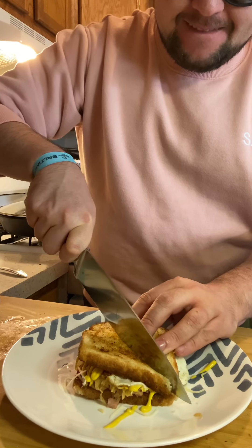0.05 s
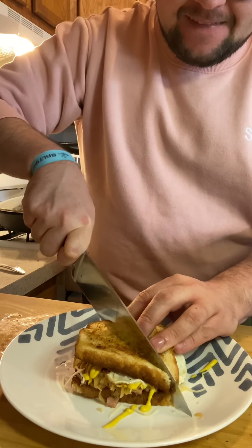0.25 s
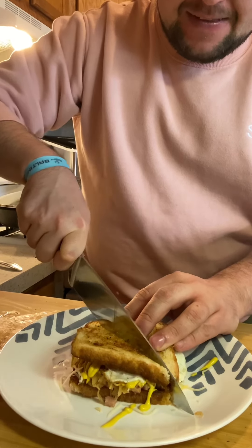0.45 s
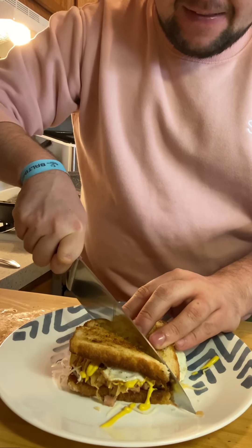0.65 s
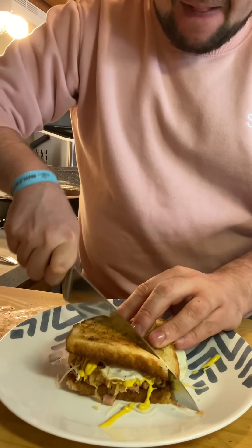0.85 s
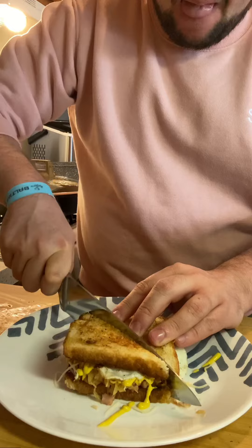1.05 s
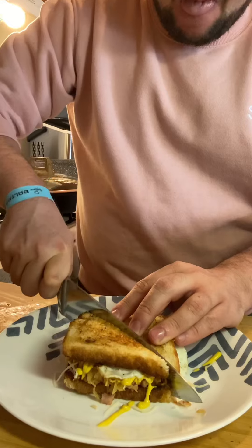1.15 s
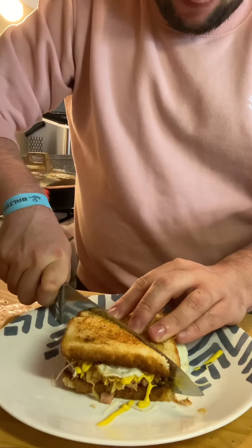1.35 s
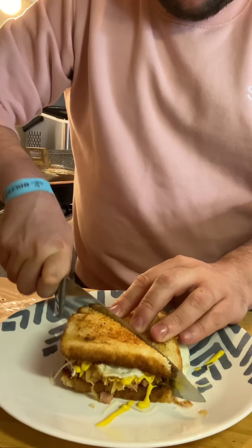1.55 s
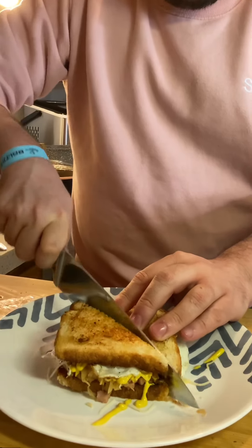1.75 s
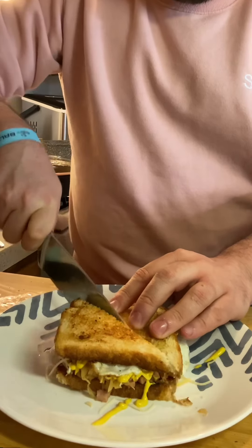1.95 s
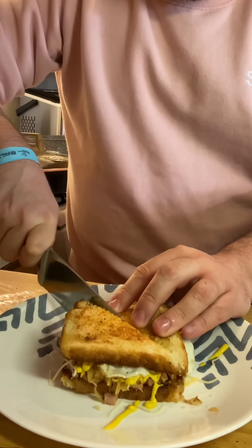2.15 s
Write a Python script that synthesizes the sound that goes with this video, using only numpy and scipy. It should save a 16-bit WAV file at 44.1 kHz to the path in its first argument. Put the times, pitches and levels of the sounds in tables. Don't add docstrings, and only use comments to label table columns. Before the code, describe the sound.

A knife saws through crisp toast on a ceramic plate, heard close in a quiet kitchen. Light crackles lead to a loud crunch, scrape and plate knocks at 0.2-0.28 s. Sparse crust snaps and a tiny squeak near 0.55 s follow, then sharper cracks around 0.83 s. Another crunching stroke spans 1.05-1.25 s, with a clack and thud at 1.35 s. Snaps fade by 1.65 s; a small scrape and crunch land near 2.1 s.

```python
import sys
import numpy as np
from scipy import signal
from scipy.fft import rfft, irfft, next_fast_len
from scipy.io import wavfile
from scipy.ndimage import uniform_filter1d

SR = 44100
rng = np.random.default_rng(int(sys.argv[2]) if len(sys.argv) > 2 else 0)


def waveform_to_disk(signal):
    frames = np.transpose(np.atleast_2d(signal))
    scaled = np.clip(frames, -1, 1) * 32767
    samples = np.round(scaled).astype(np.int16)
    wavfile.write(sys.argv[1], SR, samples)


def volts_from_db(level):
    exponent = np.asarray(level, float) / 20
    return 10 ** exponent


N = 97020

# frequency in Hz, level in dB.
PLATE_MODES = [(515, 2.5), (725, 0.5), (950, -1), (1110, 0.5), (1330, -8), (1560, 2), (1760, 4.5),
               (2240, 3.5), (2420, -3.5), (2650, -4.5), (2950, 1.5), (3350, 3.5), (3930, 5), (4400, 5)]
# start in seconds, peak level in dB, struck region in Hz,
# table thud level in dB, thud frequency in Hz.
KNOCKS = [(.2125, -24, 2350, -48, 120), (0.2175, -21, 2500, -54, 119.4), (.236, -16.5, 2260, -50, 130),
          (.265, -7.5, 940, -36, 200), (.2603, -6, 1390, -20, 65.3), (.262, -4.5, 540, -23.5, 131.4),
          (0.273, -17.5, 1220, -21.5, 195), (0.535, -41, 1010, -71, 79), (0.836, -21, 3940, -25, 78),
          (1.06, -27.5, 1900, -72.5, 80), (1.3313, -17, 3730, -23.5, 128), (1.337, -20.5, 750, -44, 194),
          (1.338, -25.5, 4160, -50, 119.6), (1.345, -17.5, 4100, -49, 138.8),
          (1.3553, -13, 2560, -42, 60.7), (1.3584, -9.5, 1640, -11.5, 161.6),
          (1.3624, -10.5, 1190, -48, 135), (1.533, -27, 1723, -41, 80.4), (2.108, -23.5, 1940, -32.5, 78),
          (2.118, -26.5, 990, -48, 78)]


def rms_one(x):
    return x / np.sqrt(np.mean(x ** 2) + 1e-20)


def in_time(rows):
    s, *columns = np.transpose(rows)
    return [np.interp(np.arange(N) / SR, s, c) for c in columns]


def colour(x, spectrum):
    size = 2 ** 12
    hz, db = np.transpose(spectrum)
    bins_hz = np.arange(size // 2 + 1) * SR / size
    log_gain = np.log(volts_from_db(np.interp(np.log(bins_hz + 1), np.log(hz), db)))
    cepstrum = irfft(log_gain)
    cepstrum[1:size // 2] *= 2
    cepstrum[size // 2 + 1:] = 0
    impulse = irfft(np.exp(rfft(cepstrum)))
    return signal.fftconvolve(np.atleast_2d(x), [impulse], axes=1)[:, :N].squeeze()


def band(x, order, low_hz, high_hz):
    return signal.sosfilt(signal.butter(order, [low_hz, high_hz], "band", fs=SR, output="sos"), x)


def drift(rate_hz):
    r = np.exp(-2 * np.pi * rate_hz / SR)
    noise = rng.standard_normal(N + SR)
    return rms_one(signal.lfilter([1], [1, -2 * r, r * r], noise)[SR:])


def ring(clicks, hz, t60):
    r, w = volts_from_db(-60 / (t60 * SR)), 2 * np.pi * hz / SR
    return signal.lfilter([0, np.sin(w)], [1, -2 * r * np.cos(w), r * r], clicks + 1e-18)


def plate_ring(push, hz):
    return ring(push, hz, .015 + 16 / hz)


def grains(per_second):
    size = volts_from_db(3.4 * np.minimum(rng.exponential(1, N), 3.5)) * rng.choice([-1, 1], N)
    happens = rng.random(N) < per_second / SR
    clumps = volts_from_db(5.5 * np.tanh(drift(22)))
    return rms_one(size * happens * clumps)


def ports(x):
    # frequency in Hz, phase in radians.
    port_phase = [(420, .3), (650, 1.9), (3200, 2.1), (4550, 1.5), (5100, 3.14), (6400, 3.14), (7100, 4.2),
                  (8900, 6.28), (12200, 6.28), (13300, 7.9), (14500, 9.42), (17000, 9.42)]
    size = next_fast_len(N + SR // 4)
    bins_hz = np.arange(size // 2 + 1) * SR / size
    turn = np.interp(bins_hz, *np.transpose([(0.03, 0.02)] + port_phase))
    return irfft(rfft(x, size) * np.exp(-.5j * turn * [[1], [-1]]), size)[:, :N]


def room_hush():
    # frequency in Hz, level in dB per Hz.
    hush_spectrum = [(30, -34.5), (65, -5.5), (300, -22), (600, -31), (1500, -31), (3200, -26),
                     (12500, -37), (15000, -39.5)]
    middle, side = colour(rng.standard_normal((2, N)), hush_spectrum)
    opposite = volts_from_db(-12.0) * band(side, 4, 600, 5000) * [[1], [-1]]
    return volts_from_db(-60) / middle.std() * (ports(middle) + opposite)


def blade():
    # time in seconds, grind level in dB, share on the plate in dB.
    saw_strokes = [(0, -55.5, 7), (.13, -53.5, 2), (.18, -43.5, 12.5), (.213, -32.5, 15),
                   (.256, -34.5, 12.5), (.34, -49.5, 6.5), (.55, -54.5, 2.5), (.79, -50.5, 4),
                   (.87, -40.5, 7), (.93, -66, -2), (1.035, -90, 36), (1.05, -55.5, 16), (1.105, -36, 7.5),
                   (1.2, -45.5, 8), (1.245, -43, -2.5), (1.3, -49.5, 11), (1.58, -61.5, 18.5),
                   (1.7, -100, 15.5)]
    # time in seconds, level in dB.
    reset_move = [
        (1.66, -91.5),
        (1.78, -75),
        (1.87, -62.5),
        (1.93, -80),
        (2.0, -69.5),
        (2.05, -52.5),
        (2.11, -40),
        (2.15, -57.5),
        (2.2, -59),
    ]
    # frequency in Hz, level in dB per Hz.
    crust_spectrum = [(150, 7.5), (400, -11.5), (1000, -1.5), (2400, -5), (4500, -4.5), (7000, -7.5),
                      (12000, -8), (15500, -9)]
    effort_db, plate_db = in_time(saw_strokes)
    reset_db, = in_time(reset_move)

    crust = rms_one(colour(grains(5000) + 0.065 * rng.standard_normal(N), crust_spectrum))
    crust = signal.sosfilt(signal.butter(10, 15800, fs=SR, output="sos"), crust)

    grit, scrape = grains(2000), 0
    for hz, mode_db in PLATE_MODES:
        level = volts_from_db(mode_db - 8 * abs(np.log2(hz / 2300)))
        scrape = scrape + level * plate_ring(grit + .5 * rng.standard_normal(N), hz)
    scrape = rms_one(scrape)

    sawing = volts_from_db(effort_db) * (volts_from_db(3) * crust + volts_from_db(-6 + plate_db) * scrape)
    return sawing + volts_from_db(reset_db) * (scrape + 0.1 * crust)


def shudder():
    # time in seconds, level in dB.
    hand_push = [(0, -42.5), (.1, -68), (.2, -33), (.36, -44), (.6, -45.5), (.8, -41.5), (.9, -40),
                 (1.03, -62), (1.12, -44), (1.26, -36), (1.32, -49.5), (1.39, -31.5), (1.49, -49.5),
                 (1.56, -38.5), (1.62, -63), (2.07, -68.5), (2.15, -44.5), (2.2, -47)]
    # frequency in Hz, level in dB, t60 in seconds.
    table_modes = [(61.2, 3.5, 0.39), (78, 0, 0.12), (126.5, -8.5, 0.1), (169.3, -10.5, 0.048),
                   (285, -27.5, 0.017), (357.4, -13, 0.08)]
    push_db, = in_time(hand_push)
    modes = [volts_from_db(d) * rms_one(ring(rng.standard_normal(N), hz, t60)) for hz, d, t60 in table_modes]
    return volts_from_db(push_db) * rms_one(sum(modes))


def snaps():
    # start in seconds, peak level in dB, brightness in dB, length in seconds.
    crust_snaps = [(0.017, -24, -6, 0.0037), (0.06, -27.5, -13, 0.0086), (0.135, -22.5, -5, 0.065),
                   (0.152, -17, -8, 0.028), (0.196, -23, 2, 0.01), (0.225, -5.5, -12, 0.015),
                   (0.244, -20, 0, 0.0039), (0.358, -55, -8, 0.0077), (0.444, -39.5, 20.5, 0.012),
                   (0.494, -33.5, 8.5, 0.019), (0.561, -28, 4.5, 0.016), (0.591, -29.5, 4.5, 0.0087),
                   (0.615, -19, -7.5, 0.013), (0.67, -24, 1, 0.035), (0.709, -30.5, 9.5, 0.01),
                   (0.748, -34, 15.5, 0.024), (0.8047, -30.5, 18.5, 0.026), (0.8345, -15, -0.5, 0.031),
                   (0.886, -20, -3, 0.0062), (0.99, -29.5, -26, 0.0093), (1.04, -18.5, -21, 0.034),
                   (1.048, -28, 6.5, 0.026), (1.09, -17, -11, 0.078), (1.127, -25.5, 7.5, 0.0032),
                   (1.143, -23, 2, 0.017), (1.192, -36, -3.5, 0.0074), (1.2168, -16, -12, 0.03),
                   (1.2341, -10.5, -12, 0.02), (1.244, -20, -9, 0.009), (1.3243, -24.5, -10, 0.0056),
                   (1.327, -15.5, -6, 0.028), (1.411, -35, -12.5, 0.004), (1.4183, -14, -17.5, 0.0045),
                   (1.439, -49, -13, 0.004), (1.46, -15, -10, 0.0037), (1.495, -24.5, -16.5, 0.0073),
                   (1.512, -24.5, -12.5, 0.0066), (1.5285, -25.5, -20, 0.015), (1.619, -35.5, -2.5, 0.022),
                   (1.639, -35.5, -5, 0.0085), (1.697, -49.5, 2, 0.006), (1.73, -51.5, 8.5, 0.006),
                   (1.916, -35.5, -13, 0.015), (1.955, -46, 7, 0.004), (2.011, -56, -3, 0.0085),
                   (2.0636, -28.5, -9, 0.018), (2.083, -19, -30, 0.018), (2.0965, -18, -28, 0.016)]
    # frequency in Hz, level in dB per Hz.
    snap_spectrum = [(300, -20), (1000, -8), (2200, -2), (4200, -1), (6300, -6), (9500, -3), (13500, -7),
                     (16500, -30)]
    out, t = np.zeros((2, N + SR)), np.arange(SR // 10) / SR
    luck = rng.standard_normal((len(crust_snaps), 2, len(t)))
    for (s, db, bright_db, length), (noise, lumps) in zip(crust_snaps, luck):
        crumble = volts_from_db(3.8 * rms_one(uniform_filter1d(lumps, size=90)))
        decay = np.exp(-t / 0.0012) + 0.34 * crumble * np.exp(-t / max(length, .002))
        burst = noise * (1 - np.exp(-t / 0.00094)) * decay
        burst[20] += 3.0
        start = int(s * SR)
        out[:, start:start + len(t)] += burst * volts_from_db(db - 10) * volts_from_db([[0], [bright_db]])
    plain, bright = colour(out[:, :N], snap_spectrum) * 2.0
    low_pass = signal.butter(1, 5000, fs=SR)
    return signal.lfilter(*low_pass, plain) + bright - signal.lfilter(*low_pass, bright)


def ticks():
    # start in seconds, peak level in dB.
    hard_ticks = [(0.0595, -50), (0.1364, -49), (0.4454, -41), (0.4923, -30.5), (0.5563, -36), (.614, -31),
                  (0.6734, -24), (0.749, -26.5), (0.8064, -21.5), (0.8168, -25.5), (0.838, -15.5),
                  (1.1248, -18.5), (1.2178, -32), (1.42, -33.5), (1.4567, -34), (1.4935, -40),
                  (1.5328, -29.5), (1.954, -47), (2.0938, -31)]
    # frequency in Hz, level in dB, t60 in seconds.
    tick_modes = [(1900, -13, 0.018), (4430, -10, 0.0066), (7130, -5, .002), (9940, -6, 0.0015),
                  (11300, -10, 0.00171)]
    s, db = np.transpose(hard_ticks)
    out = 0
    for hz, mode_db, t60 in tick_modes:
        clicks = np.zeros(N)
        clicks[(s * SR).astype(int)] = volts_from_db(db + mode_db + 5.2 * rng.standard_normal(len(s)))
        out = out + ring(clicks, hz, t60)
    return out


def crumbs_unlike(crumbs):
    # time in seconds, level in dB.
    unlike_level = [(0, -13), (.13, -12), (.17, -16), (.42, -8), (.56, -15), (.9, -5.5), (1.04, -18),
                    (1.06, -40), (1.33, -7.5), (1.4, -11.5), (1.5, -2), (1.535, -25), (1.63, -20.5), (1.95, -5),
                    (2.05, -20), (2.2, -32)]
    treble = signal.lfilter(*signal.butter(2, [4500, 8000], "band", fs=SR), crumbs)
    return volts_from_db(in_time(unlike_level)[0]) * ports(treble) * [[1], [-1]]


def knocks():
    out, t = np.zeros(N + SR), np.arange(SR // 4) / SR
    luck = rng.standard_normal((len(KNOCKS), len(PLATE_MODES) + 1, len(t)))
    for (s, db, region_hz, thud_db, thud_hz), (*rattles, crunch) in zip(KNOCKS, luck):
        hit = np.zeros(len(t))
        for (hz, mode_db), rattle in zip(PLATE_MODES, rattles):
            mode = plate_ring(rattle * np.exp(-t / 0.0037), hz)
            level = volts_from_db(db + mode_db - 8.5 - 8 * abs(np.log2(hz / region_hz)))
            hit += level * mode / np.abs(mode).max()
        wide = signal.butter(1, [region_hz / 2, region_hz * 2], "band", fs=SR)
        hit += volts_from_db(db - 10) * signal.lfilter(*wide, crunch) * np.exp(-t / 0.0077)
        push = np.exp(-((t - 0.00585) / 0.00078) ** 2)
        hit += volts_from_db(thud_db) * ring(push / push.sum(), thud_hz, 0.093 * 100 / thud_hz)
        start = int(s * SR)
        out[start:start + len(t)] += hit
    return out[:N]


def cracks():
    out, t = np.zeros((2, N + SR)), np.arange(SR // 20) / SR
    for s, db, *_ in KNOCKS:
        noise = rng.standard_normal((2, len(t)))
        start = int(s * SR)
        out[:, start:start + len(t)] += volts_from_db(2.5 * db - 1.5) * noise * np.exp(-t / 0.0077)
    return band(out[:, :N], 2, 3600, 7200)


def squeak():
    # time in seconds, frequency in Hz, level in dB.
    chirp = [
        (.532, 960, -70),
        (.536, 950, -40),
        (.546, 900, -52),
        (.555, 830, -36),
        (.563, 880, -39),
        (.572, 970, -47),
        (.585, 1040, -46),
        (.594, 1080, -66),
    ]
    hz, db = in_time(chirp)
    n = np.arange(N)
    on = (n > chirp[0][0] * SR) & (n < chirp[-1][0] * SR)
    return on * volts_from_db(db + 7.8 * drift(90)) * np.sin(2 * np.pi * np.cumsum(hz) / SR)


def kitchen(x):
    t, t60 = np.arange(SR // 2) / SR, 0.21
    tail = rng.standard_normal((2, len(t))) * volts_from_db(-60 * t / t60) * (t > .003)
    tail = band(tail, 8, 500, 3880)
    tail = tail / np.sqrt((tail ** 2).sum(1, keepdims=True))
    return signal.fftconvolve([x], tail, axes=1)[:, :N]


def scene():
    crumbs = snaps() + ticks()
    near = blade() + crumbs + knocks() + squeak()
    direct = ports(near + shudder()) + crumbs_unlike(crumbs) + cracks()
    return direct + volts_from_db(-19.5) * kitchen(near) + room_hush()


def roll_off(x):
    return signal.sosfilt(signal.butter(12, 16680, fs=SR, output="sos"), x)


def record(dry):
    mix = signal.sosfilt(signal.butter(5, 51.3, "high", fs=SR, output="sos"), dry)
    return roll_off(mix)


dry = scene()
out = record(dry)
waveform_to_disk(out)
```